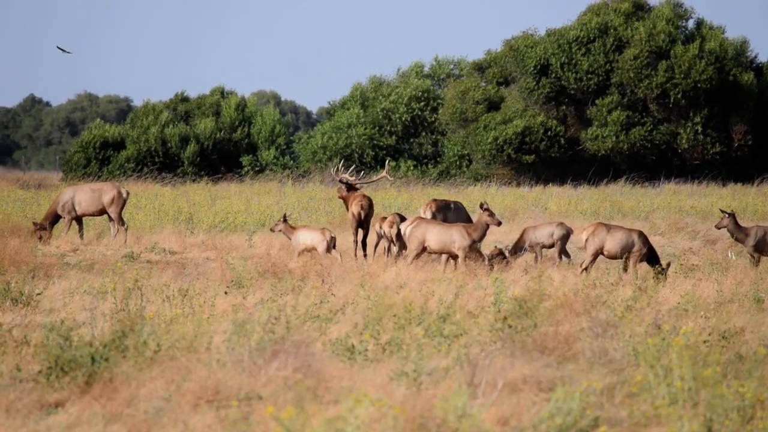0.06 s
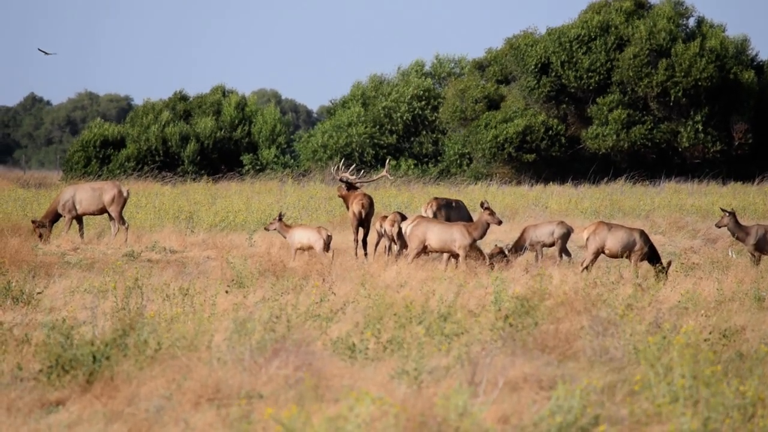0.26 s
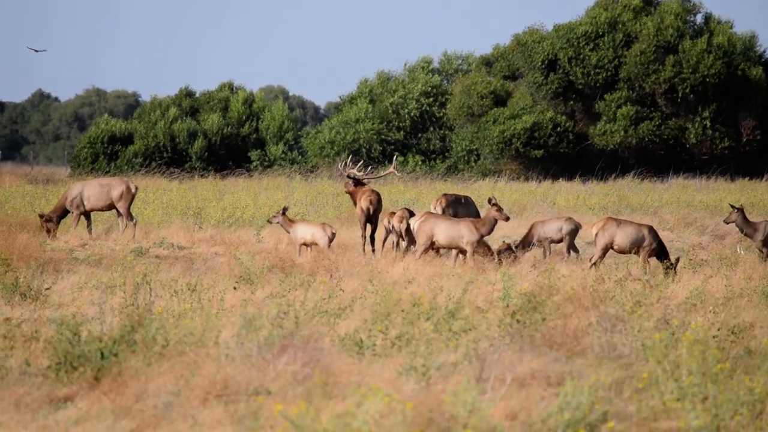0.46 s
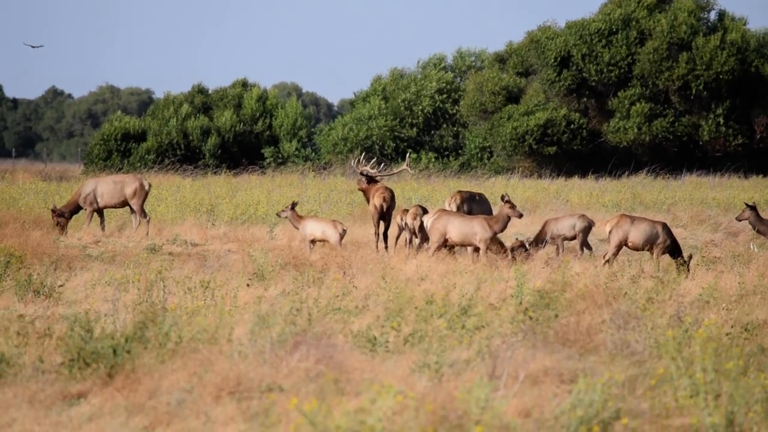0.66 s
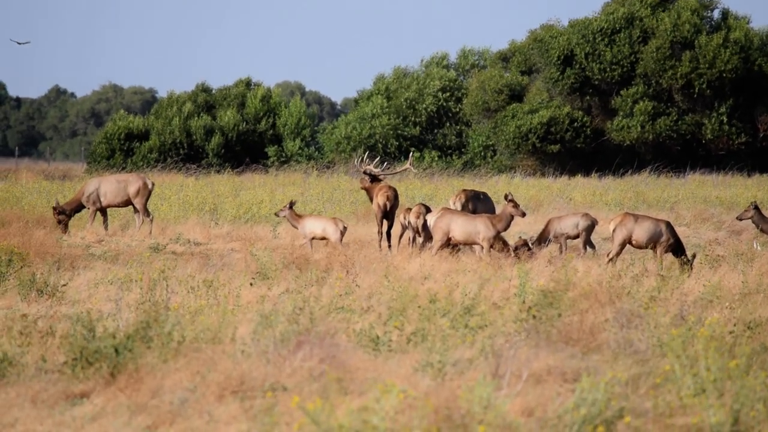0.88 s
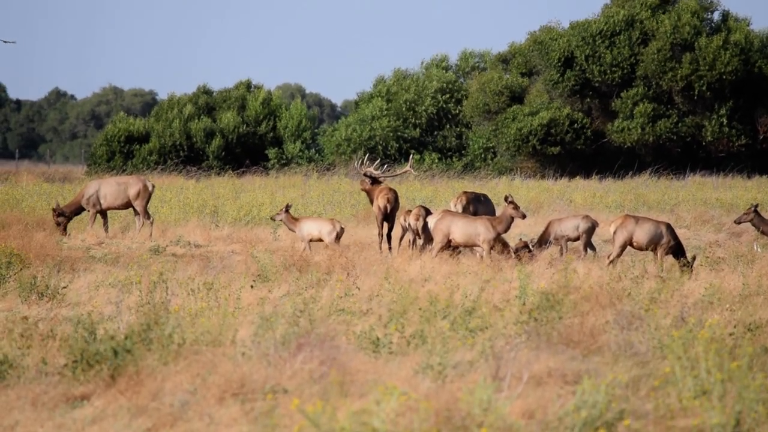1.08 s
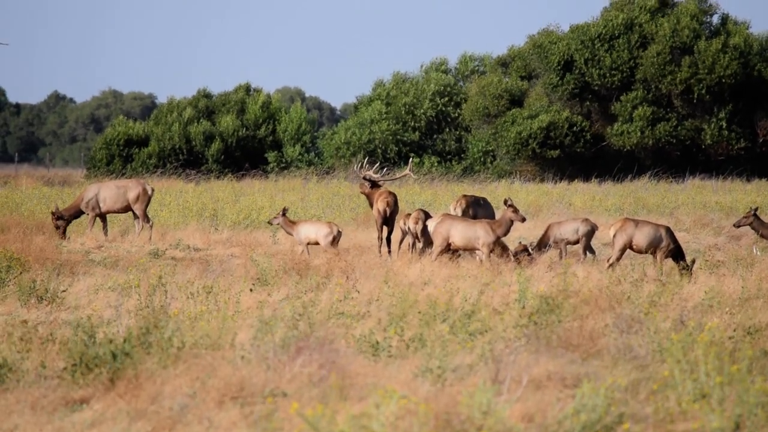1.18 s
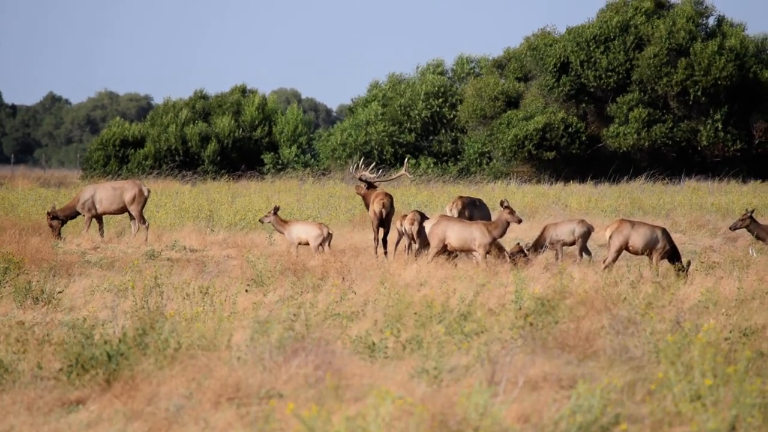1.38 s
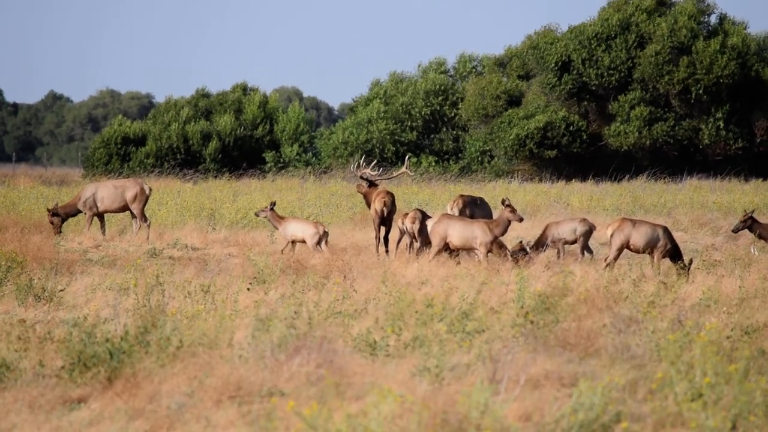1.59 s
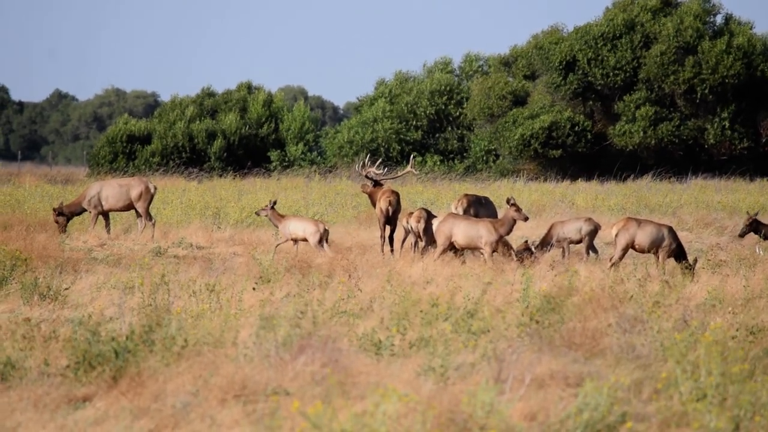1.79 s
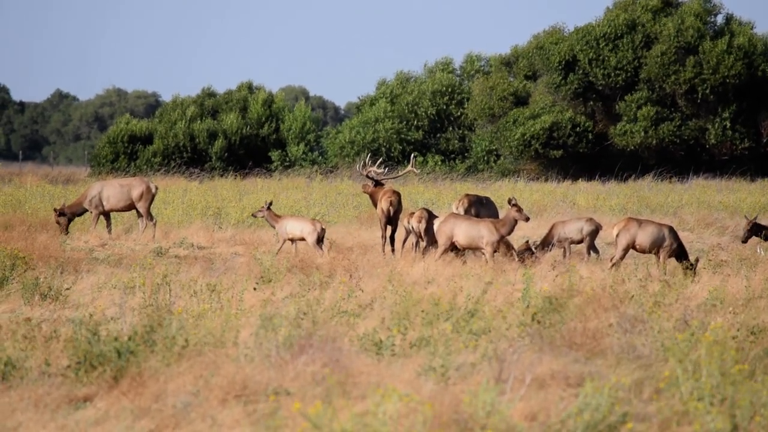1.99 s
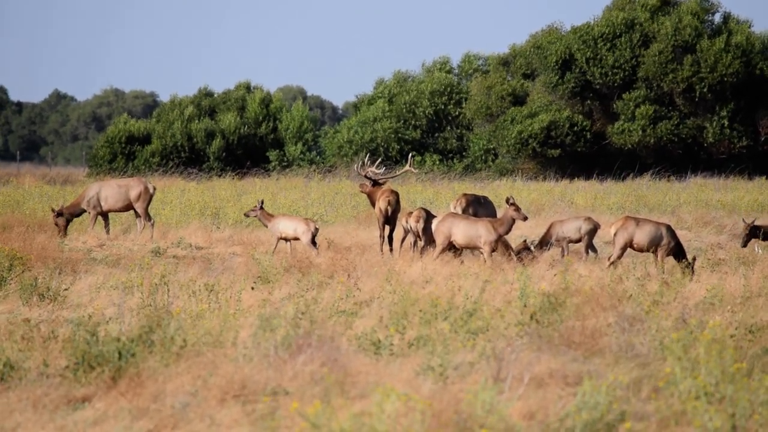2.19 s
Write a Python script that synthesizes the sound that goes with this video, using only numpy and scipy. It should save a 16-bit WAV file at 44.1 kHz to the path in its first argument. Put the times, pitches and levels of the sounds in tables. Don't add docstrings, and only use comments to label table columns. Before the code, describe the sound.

Bull elk bugling far across an open meadow, a thin steady whistle under rough wind thumps

```python
import sys
import numpy as np
from scipy import signal
from scipy.fft import rfft, irfft
from scipy.io import wavfile
from scipy.ndimage import uniform_filter1d, minimum_filter1d

SR = 44100
rng = np.random.default_rng(int(sys.argv[2]) if len(sys.argv) > 2 else 0)


def natural_amplitude(level_db):
    exponent = np.asarray(level_db, float) / 20
    return 10 ** exponent


def transcribe(signal):
    frames = np.atleast_2d(signal).T
    limited = np.clip(frames, -1, 1)
    pcm = np.round(limited * 32767).astype(np.int16)
    wavfile.write(sys.argv[1], SR, pcm)


N = 99225

# start_s, pitch_hz, level_db, octave_re_level_db
WHISTLE = [(0, 1503, -59.5, 5), (.11, 1503, -52, -9), (.235, 1494, -56.5, -6), (.26, 1505, -51, -8.5),
           (.33, 1502, -52, -5.5), (.36, 1507, -48.5, -23), (.45, 1512, -55.5, -14),
           (.66, 1513, -50, -16.5), (.98, 1521, -49.5, -7.5), (1.08, 1525, -47, -25),
           (1.18, 1531, -47, -16), (1.265, 1507, -51.5, -30), (1.285, 1447, -63, -6),
           (1.315, 1304, -42.5, -22.5), (1.335, 1245, -31.5, -29), (1.39, 1226, -32.5, -24),
           (1.424, 1212, -33.5, -24), (1.431, 1132, -44.5, -12), (1.444, 1123, -37, -18.5),
           (1.458, 1083, -50.5, -33), (1.468, 1019, -85, -27)]
# start_s, pitch_hz, level_db
YELP = [
    (1.48, 1000, -87),
    (1.495, 1059, -57),
    (1.515, 1200, -46),
    (1.535, 1236, -53),
    (1.555, 1240, -86),
]
# start_s, pitch_hz, level_db
CHEST = [
    (0, 257.3, -68),
    (.2, 245, -70.5),
    (.55, 249.7, -72),
    (.7, 251.9, -66),
    (1.0, 257.4, -64.5),
    (1.06, 262, -81),
    (1.15, 259, -86),
]
# multiple, level_db
CHEST_PARTIALS = [(7, -1), (8, -8.5), (9, -18.5), (11, -7.5)]
# start_s, pitch_hz, level_db
DIFFERENCE_TONE = [
    (.5, 1334, -95.5),
    (.68, 1228, -66),
    (.9, 1256, -62.5),
    (1.05, 1233, -62),
    (1.12, 1180, -59),
    (1.18, 1120, -95),
]
# delay_s, level_db
ECHOES = [
    (0.037, -27.5),
    (0.068, -17.5),
    (0.104, -24.5),
    (0.134, -23),
]
# start_s, level_db, left_minus_right_db
GUST = [(0.0, -35, 2), (0.26, -29.5, 9.5), (0.31, -13.5, 0), (0.45, -20.5, 0.5), (0.57, -14.5, 3),
        (0.6, -25.5, -4), (0.97, -40.5, 2.5), (1.13, -34, 5), (1.43, -34, 3.5), (1.5, -25, -6.5),
        (1.54, -23, 2), (1.59, -35, 2), (1.86, -31, 8.5), (1.89, -34.5, -8), (1.92, -38.5, 5.5),
        (1.99, -32.5, -10), (2.03, -34.5, 5.5), (2.25, -34, -1)]
# start_s, peak_db, upper_edge_hz
LEFT_EDDIES = [(0.067, -13, 300.0), (0.108, -7.5, 292), (0.22, -7.5, 383), (0.236, -13.5, 367),
               (0.278, -7, 520), (0.317, -1, 440), (0.36, -1.5, 457), (0.401, -11, 397), (0.453, -4.5, 525),
               (0.521, -0.5, 382), (0.556, -2, 350), (0.573, 0.5, 355), (1.034, -23, 300),
               (1.146, -12, 279), (1.225, -14.5, 416), (1.453, -10, 312), (1.483, -8, 329),
               (1.508, -11.5, 310.0), (1.538, -29, 368), (1.549, -14, 369.6), (1.585, -33, 383),
               (1.708, -14.5, 423), (1.719, -9.5, 293), (1.779, -14, 270), (1.85, -10.5, 463),
               (1.988, -10.5, 292), (2.079, -16.5, 290), (2.095, -15.5, 340.0), (2.142, -15.5, 483),
               (.036, -19, 260), (.049, -31, 260), (.076, -15, 285), (.088, -21, 460), (.175, -17, 273),
               (.202, -15, 280), (.246, -8, 323), (.292, -10.5, 484), (.327, -6, 340), (.344, -16, 300),
               (.375, -12.5, 380), (.407, -1.5, 330), (.431, -9, 450), (.466, -7, 381.3),
               (.612, -13.5, 496), (.72, -15, 330), (.771, -13, 444), (.858, -16, 283), (.94, -28, 273),
               (.984, -23, 271), (1.125, -19, 280), (1.418, -17.5, 318), (1.687, -13.5, 300),
               (1.772, -7.5, 258), (1.787, -11, 300), (1.863, -9.5, 430), (1.877, -12.5, 425),
               (1.939, -16, 300), (1.977, -9.5, 240), (2.049, -13.5, 300), (2.187, -14.5, 280),
               (.516, -6, 260), (.527, -2.5, 260), (.708, -20, 550)]
# start_s, peak_db, upper_edge_hz
RIGHT_EDDIES = [(0.114, -16.5, 440), (0.311, -4, 885), (0.325, -13, 730), (0.34, 1.5, 410),
                (0.359, -15, 534), (0.383, 3, 810), (0.403, -3.5, 830), (0.435, -1.5, 439),
                (0.477, 1.5, 590.0), (0.509, 1, 544), (0.522, -5.5, 300), (0.549, -1, 720),
                (0.563, -8, 790.0), (0.577, -3.5, 466), (0.627, -9, 750), (0.789, -8.5, 529),
                (0.876, -11.5, 540), (1.047, -19, 420), (1.077, -16, 536), (1.147, -9.5, 417),
                (1.498, -5, 605), (1.518, -15.5, 417), (1.571, -11.5, 520), (1.716, -8.5, 391),
                (1.786, -11, 533), (1.871, -12.5, 624), (1.883, -7, 610), (1.9885, -3.5, 375),
                (2.162, -12.5, 530), (.023, -25, 280), (.105, -23, 590), (.226, -15.5, 664),
                (.259, -12.5, 330), (.3, -11.5, 668), (.331, -9, 336), (.443, -6, 606), (.498, -9.5, 450),
                (.612, -19.5, 600), (.655, -21, 645), (.709, -16, 580), (.741, -19, 600), (.809, -23, 278),
                (.829, -22, 595), (.866, -18, 360), (.904, -25, 600), (.953, -22.5, 277),
                (1.055, -24.5, 300), (1.198, -19.5, 613), (1.483, -14, 500), (1.508, -14.5, 800),
                (1.542, -18, 710), (1.585, -18, 350), (1.637, -20, 280), (1.779, -15.5, 442),
                (1.834, -19, 540), (1.853, -13, 467), (1.962, -25, 600), (2.042, -25, 500),
                (2.152, -27, 614), (2.199, -18, 300)]
# start_s, peak_db, upper_edge_hz
RIGHT_RATTLES = [(.311, -2.5, 1100), (.326, -6.5, 960), (.34, -10.5, 1188), (.406, -6, 950), (.427, 0, 970),
                 (.465, -4.5, 810), (.481, -8, 980), (.51, -8.5, 1000), (.519, -7, 1000),
                 (.5625, -10.5, 1166), (.766, -16.5, 570), (1.9885, -14.5, 1004), (.4025, -12.5, 920),
                 (.628, -27.5, 900), (.788, -24, 800), (1.883, -28, 890), (1.498, -17.5, 840)]
# start_s, peak_db, left_minus_right_db
TICKS = [
    (.3402, -15, -10),
    (.3594, -20, -5),
    (.383, -26, -10),
    (.4012, -14, 10),
    (.427, -22, -15),
    (.4355, -16, -15),
    (.5208, -14, 5),
    (.526, -19, 12),
]
# start_s, peak_db, left_minus_right_db
TAPS = [
    (.196, -43.5, 0.5),
    (1.4555, -37.5, 9.5),
    (1.489, -53, 7),
]
# frequency_hz, density_db_per_hz
FLOOR = [(530, -28), (900, -16), (1150, -3.5), (2610, -10.5), (4130, -11), (4590, -12.5), (5870, -19),
         (14800, -30.5)]
# centre_hz, width_hz, level_db
MOTOR = [(3742, 63, -1.5), (4550, 75, -2.5), (5235, 200, -4), (6370, 180, -13)]

PORT_LAG = 1
WIND_LOW_HZ = 128.2


def in_time(rows):
    s, *columns = np.transpose(rows)
    return [np.interp(np.arange(N) / SR, s, c) for c in columns]


def rms_one(x):
    return x / np.sqrt(np.mean(x ** 2) + 1e-20)


def cut(x, hz, kind, order=2):
    return signal.sosfilt(signal.butter(order, hz, kind, fs=SR, output="sos"), x)


def drift(rate_hz):
    r = np.exp(-2 * np.pi * rate_hz / SR)
    wander = signal.lfilter([1], [1, -2 * r, r * r], rng.standard_normal(N + SR))
    return rms_one(wander[SR:])


def panned(pan_db):
    pan_db = np.asarray(pan_db)
    return np.sqrt(2 / (1 + natural_amplitude(2 * np.array([-pan_db, pan_db]))))


def tone(hz, db):
    return np.sqrt(2) * natural_amplitude(db) * np.sin(2 * np.pi * np.cumsum(hz) / SR)


def whistle():
    hz, db, octave_db = in_time(WHISTLE)
    waver_hz, shimmer_db = 1.2, 0.6
    hz = hz + waver_hz * drift(13)
    db = db + shimmer_db * drift(17.0)
    octave = tone(2 * hz, db + octave_db + shimmer_db * drift(7.8))
    third_hz, third_width_hz = 3610, 50
    third_db = -24 - 10 * ((3 * hz - third_hz) / third_width_hz) ** 2
    return tone(hz, db) + octave + tone(3 * hz, db + third_db)


def yelp():
    hz, db = in_time(YELP)
    return tone(hz, db) + tone(2 * hz, db - 25)


def chest_voice():
    hz, db = in_time(CHEST)
    partials = sum(tone(k * hz, db + rel_db + 5.2 * drift(6.2)) for k, rel_db in CHEST_PARTIALS)
    difference_hz, difference_db = in_time(DIFFERENCE_TONE)
    return partials + tone(difference_hz, difference_db + 3.0 * drift(9))


def elk():
    call = whistle() + yelp() + chest_voice()
    out = call * panned(0.3)[:, None]
    for delay_s, echo_db in ECHOES:
        for side in out:
            lag = int((delay_s + rng.uniform(0, 0.0013)) * SR)
            side[lag:] += natural_amplitude(echo_db) * cut(call, 3800, "low")[:-lag]
    return out


def buffeting():
    gusts, kicked = wind(), eddies()
    share = uniform_filter1d(np.abs(kicked), size=350) / uniform_filter1d(np.abs(gusts), size=2500)
    displaces = 0.7
    return kicked + gusts / (1 + displaces * share)


def eddies():
    left = kicks(LEFT_EDDIES)
    right = kicks(RIGHT_EDDIES) + kicks(RIGHT_RATTLES)
    both = -np.array([left, right])
    return both + natural_amplitude(-33.5) * both[::-1]


def kicks(rows):
    half = 800
    out, t = np.zeros(N + SR), np.arange(-half, half) / SR
    centre, wake_s, wake_db = 0.56, 0.004, -16
    for (s, db, edge_hz), white in zip(rows, rng.standard_normal((len(rows), len(t)))):
        pointed = np.real((1 - 1j * 2 * np.pi / 3 * centre * edge_hz * t) ** -4)
        wake = cut(white, [WIND_LOW_HZ, edge_hz], "band")
        wake = rms_one(cut(wake, 1.23 * edge_hz, "low", order=3))
        kick = pointed + natural_amplitude(wake_db) * wake * np.exp(-(t / wake_s) ** 2)
        i = int(s * SR)
        out[i:i + len(t)] += natural_amplitude(db) * kick
    return cut(out, 0.9 * WIND_LOW_HZ, "high", order=4)[half:N + half]


def gust_lumps():
    lumps = 2 * drift(19) + 4.5 * drift(39)
    cap_db = 7
    lumps = np.minimum(lumps, cap_db * np.tanh(lumps / cap_db))
    return lumps - 10 * np.log10(uniform_filter1d(natural_amplitude(2 * lumps), size=4000))


def wind():
    db, pan_db = in_time(GUST)
    body_hz, bright_hz = 300, 861
    out = []
    for side, tilt in zip(panned(pan_db), panned(-6)):
        level_db = db + 20 * np.log10(side) + gust_lumps()
        white = rng.standard_normal((3, N))
        body = natural_amplitude(level_db + 6.5) * rms_one(cut(white[0], body_hz, "low"))
        body = cut(body, 1.2 * body_hz, "low")
        bright_db = -34.5 + 1.31 * (level_db + 27.5)
        bright = tilt * natural_amplitude(bright_db) * rms_one(cut(white[1], bright_hz, "low"))
        bright = cut(bright, bright_hz, "low", order=4)
        rumble_db = -45 + 0.15 * (level_db + 33) + 5.5 * drift(13)
        rumble = natural_amplitude(rumble_db) * rms_one(cut(white[2], [60, 129], "band"))
        out.append(cut(body + bright, WIND_LOW_HZ, "high", order=4) + rumble)
    return np.array(out)


def ticks():
    s, db, pan_db = np.transpose(TICKS)
    clicks = np.zeros((2, N)) + 1e-18
    clicks[:, (s * SR).astype(int)] = natural_amplitude(db) * panned(pan_db)
    return cut(cut(clicks, [500, 1900], "band", order=1), 9000, "low", order=1)


def taps():
    length_s = 0.0015
    out, t = np.zeros((2, N + SR)), np.arange(400) / SR / length_s
    for (s, db, pan_db), white in zip(TAPS, rng.standard_normal((len(TAPS), 400))):
        i = int(s * SR)
        puff = natural_amplitude(db) * white * t * np.exp(1 - t)
        out[:, i:i + len(t)] += puff * panned(pan_db)[:, None]
    return natural_amplitude(5.0) * cut(out[:, :N] + 1e-18, [1900, 4300], "band", order=3)


def pair(alike):
    white = rng.standard_normal((3, N))
    shared = np.array([white[0], np.roll(white[0], PORT_LAG)])
    return np.sqrt(alike) * shared + np.sqrt(1 - alike) * white[1:]


def preamplifier_hiss():
    hz, db = np.transpose(FLOOR)
    f = np.arange(N // 2 + 1) * SR / N + 1
    density = natural_amplitude(np.interp(np.log(f), np.log(hz), db)) * (f > 500) * (f < 15300)
    return natural_amplitude(-58.5) * rms_one(irfft(rfft(pair(0.25)) * density, N))


def motor():
    out = 0
    for centre_hz, width_hz, level_db in MOTOR:
        r, w = np.exp(-np.pi * width_hz / SR), 2 * np.pi * centre_hz / SR
        ring = signal.lfilter([1, 0, -1], [1, -2 * r * np.cos(w), r * r], pair(0.6))
        out = out + natural_amplitude(level_db + 3 * drift(40)) * rms_one(ring)
    return natural_amplitude(-67) * out


def whine():
    lag_rad = np.array([[1.6], [0]])
    phase = 2 * np.pi * 15701 * np.arange(N) / SR - lag_rad
    return np.sqrt(2) * natural_amplitude(-75.5 + 0.6 * drift(4)) * np.sin(phase) * panned(7.5)[:, None]


def scene():
    far = elk()
    far[1] = np.roll(far[1], PORT_LAG)
    handled = buffeting() + ticks() + taps()
    camera = preamplifier_hiss() + motor() + whine()
    return far + handled + camera


def band_limit(x):
    return signal.sosfilt(signal.butter(12, 15970, fs=SR, output="sos"), x)


def record(dry):
    span, ceiling = int(0.004 * SR), 0.98
    gain = np.minimum(1, ceiling / (np.abs(dry) + 1e-9))
    gain = minimum_filter1d(gain, size=2 * span)
    return band_limit(dry * uniform_filter1d(gain, size=span))


dry = scene()
out = record(dry)
transcribe(out)
```